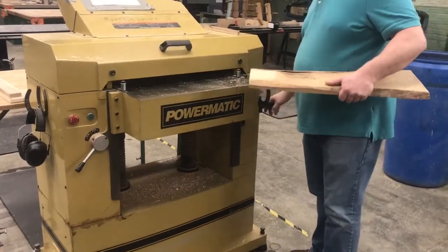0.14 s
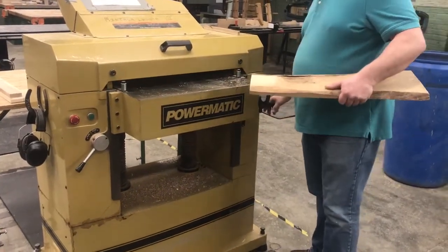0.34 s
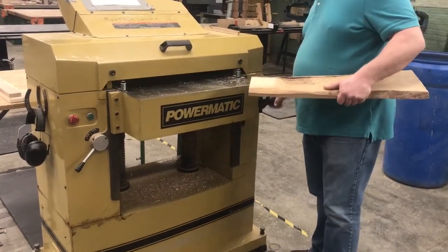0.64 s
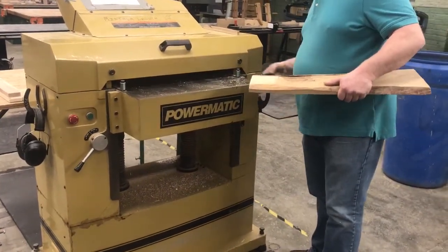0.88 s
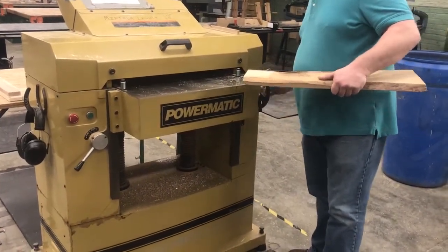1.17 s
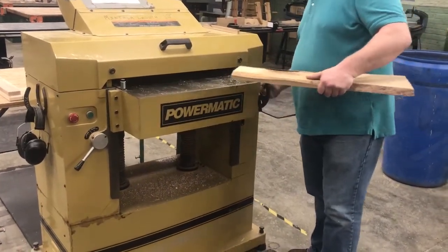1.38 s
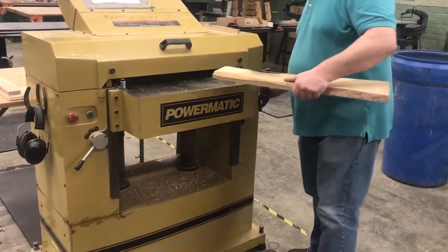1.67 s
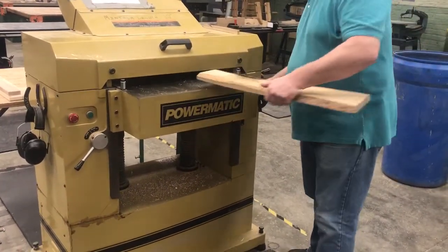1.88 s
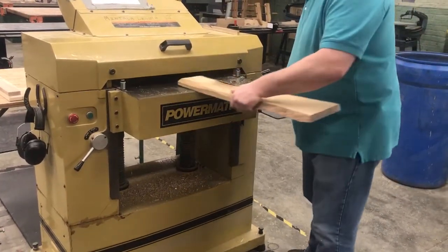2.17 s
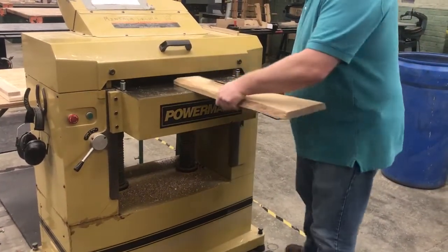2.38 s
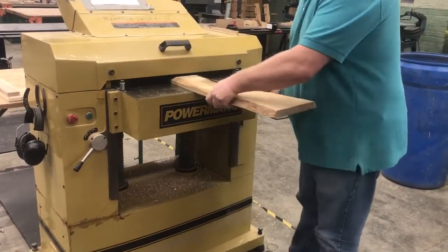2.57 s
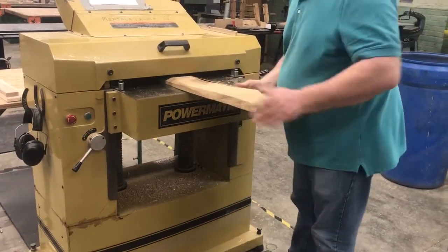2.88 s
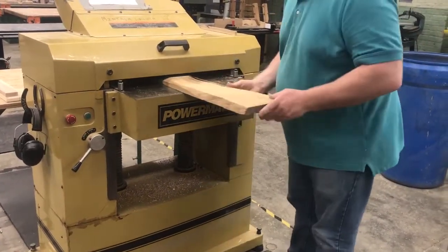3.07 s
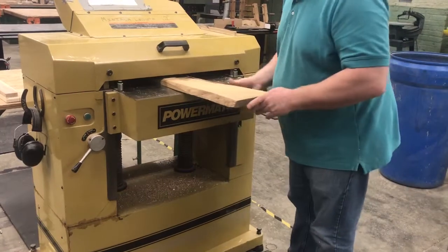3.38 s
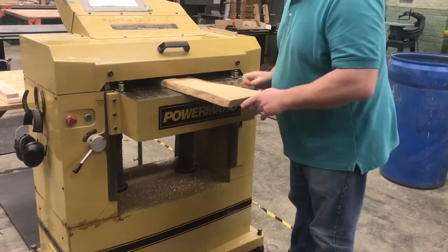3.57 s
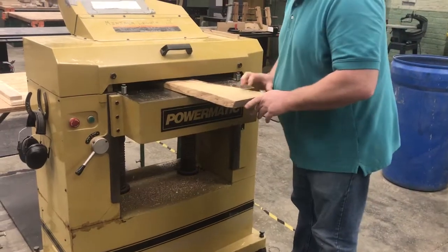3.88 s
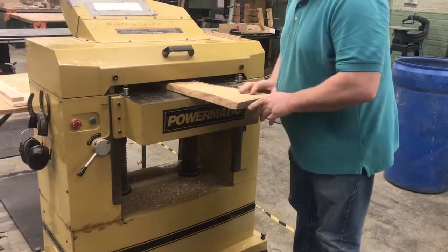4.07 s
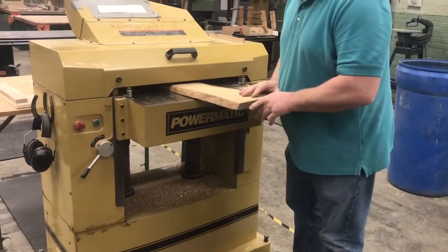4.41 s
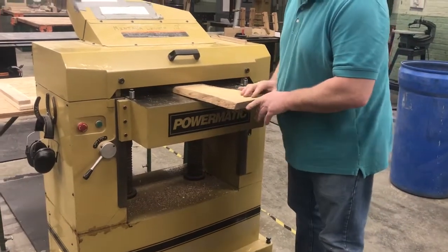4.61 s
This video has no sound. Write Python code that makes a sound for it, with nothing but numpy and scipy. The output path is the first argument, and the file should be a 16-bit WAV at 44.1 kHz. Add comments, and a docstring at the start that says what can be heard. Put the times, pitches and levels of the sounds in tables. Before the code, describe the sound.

A large thickness planer is already running at the start, heard from close by in a wood shop. Its spinning knives hold a loud, steady, siren-like whine at a low-middle pitch, with a fast throb an octave above. Beneath it are rushing air, a blower's higher note and a low motor hum. A belt ticks faintly against the steel hood about twelve times a second, with an occasional sharper metallic tick. From about 1.5 to 2.7 seconds the whine changes colour slightly and the hiss lifts a little as a board nears the slot. The tone shifts subtly again around 3.3 seconds, while the pitch stays the same. At about 4.6 seconds, right at the end, the knives bite into the board with a loud, bright, ragged buzz and a rasping howl, with a short room echo.

```python
"""A thickness planer, a machine that shaves boards, idles in a wood shop. Its four spinning knives whine
like a siren over rushing air, a blower's note, motor hum and a belt that ticks in the hood once a lap.
A rough board is swung up to the slot, which changes the colour of the whine, and is then pushed in.
The knives chop it with a ragged buzz, and a limiter turns the loud peaks down, and the whine with them."""
import sys
import numpy as np
from scipy import signal
from scipy.fft import rfft, irfft, next_fast_len
from scipy.io import wavfile
from scipy.ndimage import uniform_filter1d, minimum_filter1d, map_coordinates

SR = 44100
rng = np.random.default_rng(int(sys.argv[2]) if len(sys.argv) > 2 else 0)


def materialize(psi):
    """Save the field psi as 16-bit PCM at rate SR to the path in sys.argv[1].

    A 1-D psi becomes a single channel; in a 2-D psi each row is a channel.
    """
    bounded = np.clip(np.atleast_2d(psi).T, -1, 1)
    quanta = np.round(bounded * 32767).astype(np.int16)
    wavfile.write(sys.argv[1], SR, quanta)


N = 209386

KNIFE_HZ, BELT_HZ = 320.9, 12.15  # knife passes and belt laps each second
SWING_AT_S, SWING_S = 1.5, 1.2  # the board is swung up to the slot,
PUSH_AT_S, PUSH_S = 3.3, .25  # pushed in,
BITE_S = 4.5725  # and meets the knives

# notes the steel hood rings at: (pitch [Hz], width [Hz], boost to the hiss [dB], ring when hit [dB])
HOOD_NOTES = [(5250, 83, 5.5, -18), (5620, 78, 2, -13), (6690, 160, 3.5, -16), (8350, 300, 2, -26),
              (13300, 250, 4, -36)]


def amp(db):
    """Turn decibels into a factor to multiply by."""
    return 10 ** (np.asarray(db) / 20)


def unit(x):
    """Scale x to an average (rms) size of 1."""
    return x / np.sqrt(np.mean(x ** 2) + 1e-20)


def along(points, hz):
    """Read between (Hz, value) points on a scale of octaves."""
    pitches, values = np.transpose(points)
    return np.interp(np.log(hz + 1), np.log(pitches + 1), values)


def ramp(start_s, length_s):
    """Rise evenly from 0 to 1."""
    return np.clip((np.arange(N) / SR - start_s) / length_s, 0, 1)


def wobble(rate):
    """A smooth curve through `rate` random values a second."""
    return map_coordinates(rng.standard_normal(int(N * rate / SR) + 4), [np.arange(N) * rate / SR])


def filtered(x, response):
    """Multiply each frequency in x by response(hz)."""
    size = next_fast_len(N + SR // 2)
    return irfft(rfft(x, size) * response(np.fft.rfftfreq(size, 1 / SR)), size)[:N]


def coloured(x, spectrum):
    """Shape x by (Hz, dB) points; white noise keeps its power."""
    return filtered(x, lambda hz: unit(amp(along(spectrum, hz))))


def turns(hz, drift):
    """Count the cycles of a spinning part whose speed drifts a little."""
    return np.cumsum(hz * (1 + drift * wobble(5))) / SR


def tone(cycles):
    """A sine wave of rms 1 that starts anywhere in its cycle."""
    return np.sqrt(2) * np.sin(2 * np.pi * (cycles + rng.random()))


def knife_whine(knife, swing):
    """Each knife squeezes air past the table's edge; the board makes some overtones louder or softer."""
    # steady tones of the whine: (multiple of the knife rate, level [dB])
    steady_tones = [(1, -17.5), (7, -61), (8, -58.5), (9, -59), (14, -68)]
    # tones the board alters: (multiple, open-slot level [dB], change by swing [dB], then by push [dB])
    overtones = [(3, -39.3, 3.5, 0), (4, -44, 2.2, -4.6), (5, -50.4, 5.3, -3.5), (6, -61.5, 3.5, 3.5)]
    steady = sum(amp(db + .14 * wobble(14)) * tone(round(k) * knife) for k, db in steady_tones)
    cover = swing ** 2  # the board covers the slot mostly at the end of its swing
    push = ramp(PUSH_AT_S, PUSH_S)
    upper = np.zeros(N)
    for k, open_db, swing_db, push_db in overtones:
        level_db = open_db + cover * swing_db + push * push_db
        upper += amp(level_db + .6 * wobble(4) + .87 * wobble(22)) * tone(round(k) * knife)
    # the tone an octave up throbs in pulses of uneven height
    throb_hz, first_throb_s = 17.045, .045
    beat = (np.arange(N) / SR - first_throb_s) * throb_hz + 1.5
    heights = amp(3.6 * rng.standard_normal(int(beat[-1]) + 1).clip(max=1))
    throb = 1 + 1.55 * heights[beat.astype(int)] * np.abs(np.sin(np.pi * beat)) ** 3
    dip_db = 3 * np.sin(np.pi * swing)  # deepest in mid-swing
    octave = amp(-34.5 - dip_db) * throb * tone(2 * knife)
    return steady + upper + octave


def belts_motor_and_blower(motor_hz=59.55, blower_hz=537.6):
    """The motor's hum beats slowly against the belts; the dust blower sings its own note."""
    # uneven belts shake the cabinet: (multiple of the lap rate, level [dB])
    belt_tones = [(5, -51.5), (6, -61), (7, -53), (8, -55), (9, -58.5), (11, -51), (13, -56.5), (14, -49.5),
                  (15, -57.5), (16, -57), (19, -56), (22, -56), (24, -47.5)]
    t = np.arange(N) / SR
    belts = sum(amp(db + 1.6 * wobble(6.9)) * tone(round(k) * BELT_HZ * t) for k, db in belt_tones)
    motor = amp(-55.5) * tone(motor_hz * t)
    blower = amp(-36.5 + wobble(14)) * tone(turns(blower_hz, drift=.0012))
    return belts + motor + blower


def rushing_air(knife, swing):
    """Air swirls round the knives; its hiss pulses faintly with knives and belts and rings in the hood."""
    # the air's low roar: (frequency [Hz], relative level [dB])
    roar_shape = [(25, -28), (45, -17), (75, -10.5), (170, -4), (300, -4), (390, 0.5), (440, -10),
                  (510, -4), (630, -1.2), (780, -0.7), (930, -9.5), (1170, -7.5), (1400, -12.5),
                  (2200, -43.5)]
    # the air's high hiss: (frequency [Hz], relative level [dB])
    hiss_shape = [(900, -25), (1600, 0), (1900, -3.5), (2800, -1), (3400, -4.5), (4400, -6.5), (4900, -12),
                  (5400, -8), (7000, -8.5), (8500, -13), (10000, -18.5), (10500, -23), (13200, -24.5),
                  (14400, -35)]
    roar = amp(-34.8 + .79 * wobble(19)) * coloured(rng.standard_normal(N), roar_shape)
    pulsing = 1 + .043 * tone(knife) + .03 * tone(2 * BELT_HZ * np.arange(N) / SR)
    hiss_gain = amp(-43.8 + .7 * wobble(25) + .2 * wobble(2))
    hiss = hiss_gain * coloured(pulsing * rng.standard_normal(N), hiss_shape)

    def hood_boost(hz):
        return amp(sum(db / (1 + (2 * (hz - pitch) / width) ** 2) for pitch, width, db, _ in HOOD_NOTES))

    return roar + amp(.9 * swing) * filtered(hiss, hood_boost)  # more hiss with the board at the slot


def shop_echo(x, echo_db):
    """Mix in the workshop's echo, whose treble dies first."""
    # how long the room rings: (frequency [Hz], time to fade by 60 dB [s])
    fade_times = [(200, 0.38), (2000, .5), (12000, 0.22)]
    hz, t, noise = signal.stft(rng.standard_normal(SR // 2), SR, nperseg=256)
    fade = amp(-60 * t / along(fade_times, hz)[:, None])
    tail = signal.istft(noise * fade, SR, nperseg=256)[1]
    room = signal.fftconvolve(x, tail / np.linalg.norm(tail))[:N]
    return (x + amp(echo_db) * room) / np.hypot(1, amp(echo_db))


def hood_ticks(first_tick_s=.109, fade_s=.074):
    """The belt's seam, once a lap, and a few stray chips scuff the steel hood and ring it briefly."""
    # laps on which the seam slaps hard: (lap number from 0, strength [dB])
    hard_laps = [(0, -33.5), (15, -34.5), (20, -32), (28, -33.5), (30, -31.5), (32, -34), (39, -33),
                 (47, -33), (50, -33)]
    # stray chips hit the hood: (time [s], strength [dB])
    chips = [(1.377, -33.5), (3.5537, -34.5), (3.7844, -35)]
    # the scuff on the steel: (frequency [Hz], relative level [dB])
    scuff_shape = [(1500, -22), (4500, -9), (5400, 9), (7000, 0), (9000, -14), (15000, -27)]
    laps_s = np.arange(first_tick_s, N / SR, 1 / BELT_HZ)
    laps_db = -42 + 1.8 * rng.standard_normal(len(laps_s))  # most ticks are faint
    for lap, db in hard_laps:
        laps_db[lap] = db
    t = np.arange(SR // 8) / SR
    scuff, ring = np.zeros((2, N + SR))
    for time_s, db in [*zip(laps_s, laps_db), *chips]:
        blow = amp(db - 60 * t / fade_s) * (1 - np.exp(-t / .0015))
        notes = np.zeros(len(t))
        for hz, _, _, ring_db in HOOD_NOTES:
            gain = amp(ring_db + 2.5 * rng.standard_normal())
            wander = .012 * np.cumsum(rng.standard_normal(len(t)))
            notes += gain * tone(hz * t + wander)
        start = round(time_s * SR)
        scuff[start:][:len(t)] += amp(-8) * blow * rng.standard_normal(len(t))
        ring[start:][:len(t)] += blow * notes
    return shop_echo(coloured(scuff[:N], scuff_shape) + ring[:N], echo_db=-8)


def splintering(knife, cutting_s, knives=4):
    """Each knife tears off a chip: a burst of noise, partly alike on every turn and partly new."""
    # tearing wood: (frequency [Hz], relative level [dB])
    splinter_shape = [(200, -20.5), (550, -12.5), (1100, -1.5), (2000, -2), (2700, -0.5), (4000, 1),
                      (4800, -5), (6000, -3), (7500, -6), (8200, -8.5), (10500, -17.5), (11700, -19),
                      (15500, -32)]
    # the first nick is loud and bright, then eases
    loudness = amp(-9.2 - 37 * cutting_s) * (1 - np.exp(-cutting_s / .015))
    treble_db = -1.2 + 9 * np.exp(-cutting_s / .023)
    stroke = knife.astype(int)
    age_s = (knife % 1) / KNIFE_HZ  # time since this stroke began
    edge = rng.standard_normal((knives, SR // 100))[stroke % knives, (age_s * SR).astype(int)]
    new_share = .6
    tear = np.sqrt(1 - new_share) * edge + np.sqrt(new_share) * rng.standard_normal(N)
    # every other knife sticks out and bites deeper
    bite = amp(1.3 * (stroke % 2) + 1.2 * rng.standard_normal(N // 50)[stroke])
    bursts = loudness * unit(bite * np.exp(-age_s / .001) * tear)
    # the board closes the slot as it enters and muffles the treble
    body = filtered(bursts, lambda hz: 1 / (1 + (hz / 3000) ** 2))
    treble = amp(treble_db) * (bursts - body)
    return shop_echo(coloured(body + treble, splinter_shape), echo_db=3)


def board_howl(knife, load):
    """The knives shake the board and the bed under it: a high rasp that soon turns into a howl."""
    # the shaking's tones; half multiples come from unequal knives:
    # (multiple of the knife rate, relative level at first nick [dB], in full contact [dB])
    board_tones = [(2, -24, -5), (2.5, -26, -17), (3, -9, -15), (3.5, -18, -7), (4, -9, -17),
                   (5, -10, -7.5), (6, -4, -1.5), (7, -11, -18), (8, -5, -14), (9, -9, -15), (10, -13, -17),
                   (12, -16, -19), (13.5, -16, -18), (16, -14, -27), (25, -24, -21)]
    contact = ramp(BITE_S + .04, length_s=.06)
    howl = np.zeros(N)
    for k, nick_db, full_db in board_tones:
        gain = (1 - contact) * amp(nick_db) + contact * amp(full_db)
        flicker = amp(2 * wobble(60))
        howl += gain * flicker * tone(round(2 * k) / 2 * knife + .061 * wobble(70))
    return amp(-9.3) * load * howl


def scene():
    """The same spinning knives drive the whine, air and cut; they slow slightly in the wood."""
    swing = ramp(SWING_AT_S, SWING_S)
    cutting_s = np.maximum(np.arange(N) / SR - BITE_S, 0)  # time since the board met the knives
    load = 1 - np.exp(-cutting_s / .048)  # 0 idling, 1 cutting fully
    knife = turns(KNIFE_HZ * (1 - .002 * load), drift=.0003)  # running count of knife passes
    machine = knife_whine(knife, swing) + belts_motor_and_blower() + rushing_air(knife, swing)
    return (machine + hood_ticks() + splintering(knife, cutting_s) + board_howl(knife, load))[None]


def record(dry, ceiling=.72, top_hz=15730):
    """A fast limiter holds the peaks down, then the highest treble is cut off."""
    x = dry[0]
    needed_gain = np.minimum(1, ceiling / (np.abs(x) + 1e-9))
    held_gain = minimum_filter1d(needed_gain, size=140)
    smooth_gain = uniform_filter1d(held_gain, size=120)
    return filtered(x * smooth_gain, lambda hz: hz < top_hz)[None]


dry = scene()
out = record(dry)
materialize(out)
```